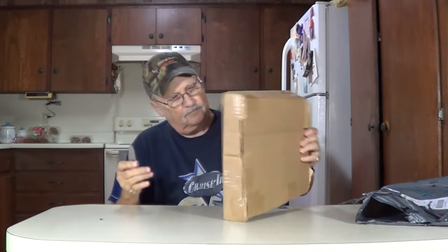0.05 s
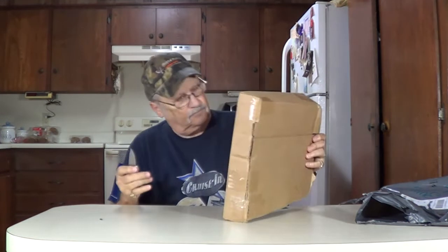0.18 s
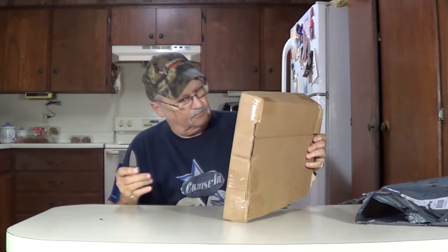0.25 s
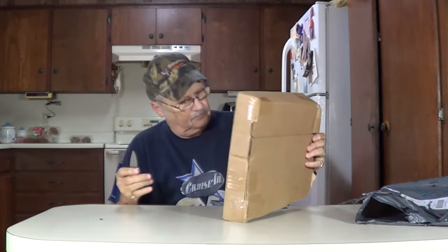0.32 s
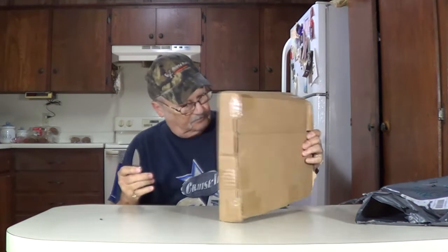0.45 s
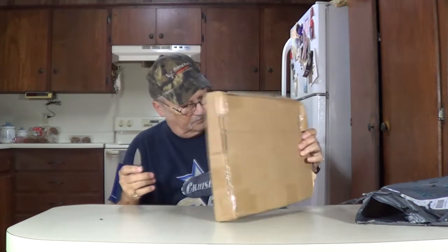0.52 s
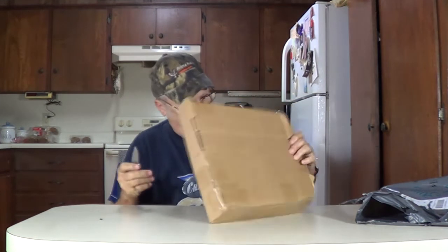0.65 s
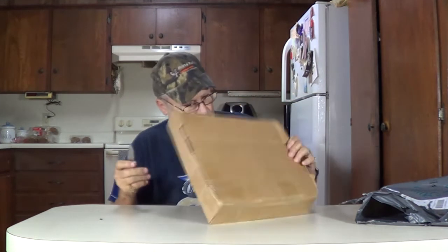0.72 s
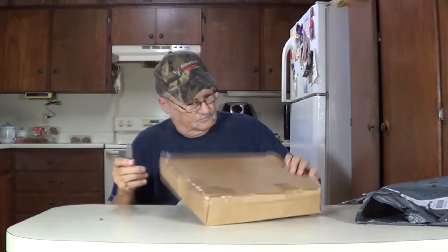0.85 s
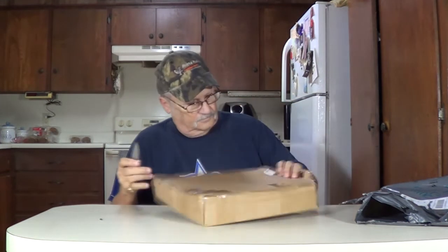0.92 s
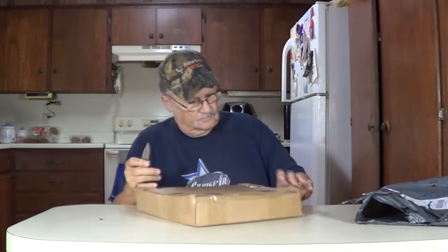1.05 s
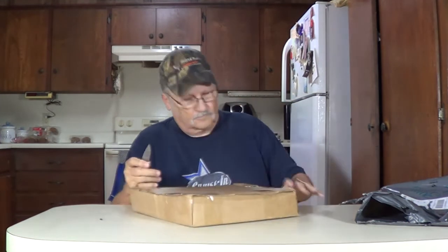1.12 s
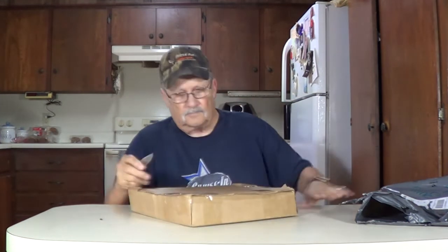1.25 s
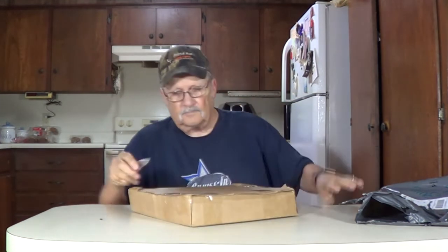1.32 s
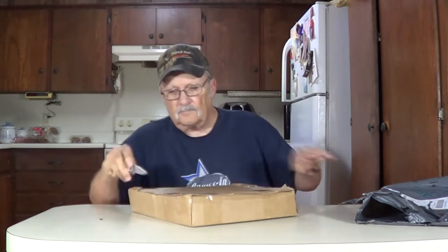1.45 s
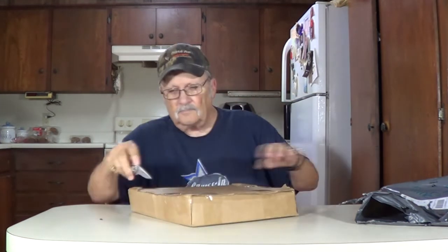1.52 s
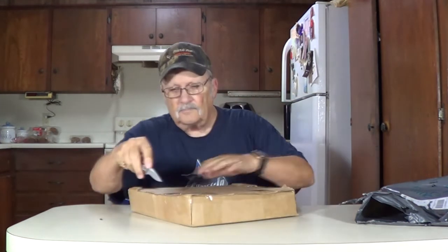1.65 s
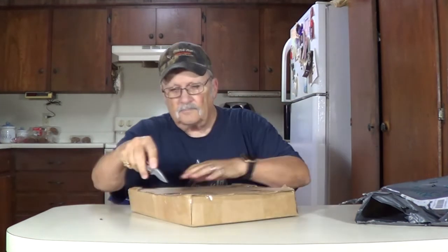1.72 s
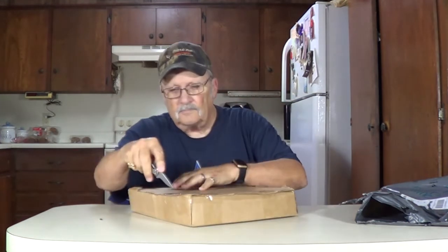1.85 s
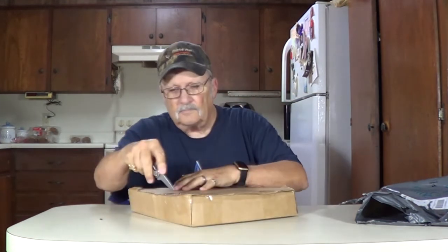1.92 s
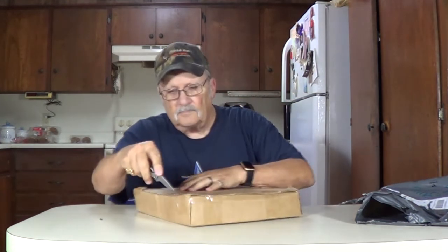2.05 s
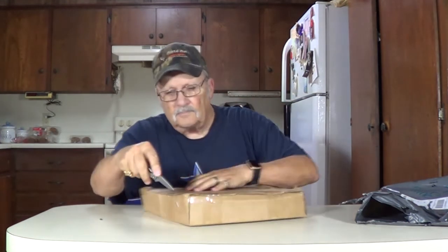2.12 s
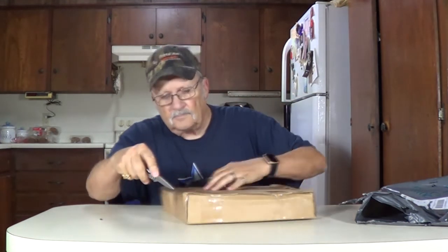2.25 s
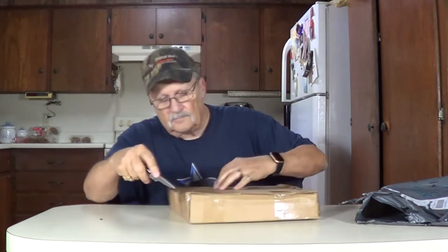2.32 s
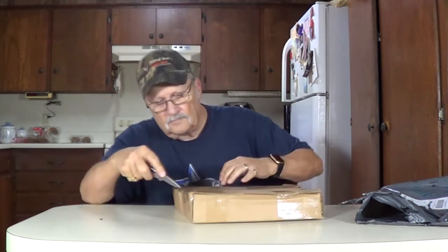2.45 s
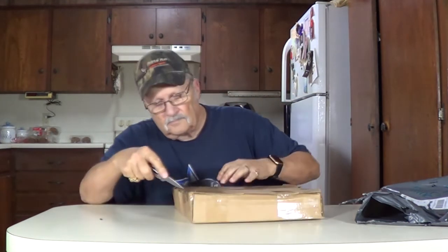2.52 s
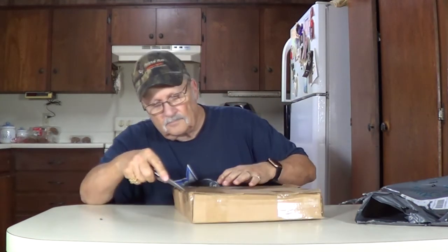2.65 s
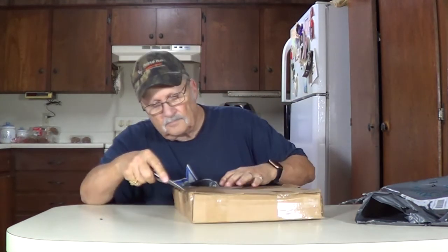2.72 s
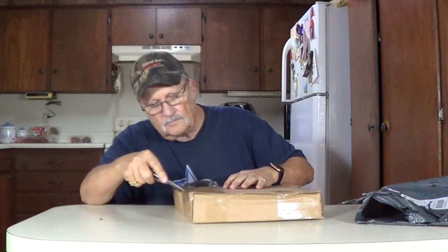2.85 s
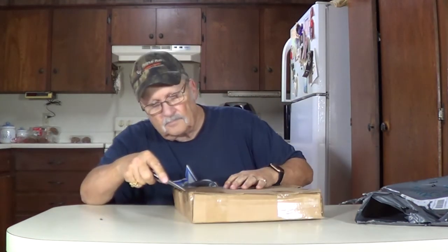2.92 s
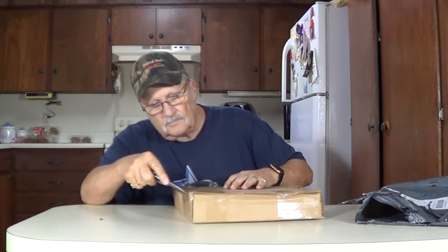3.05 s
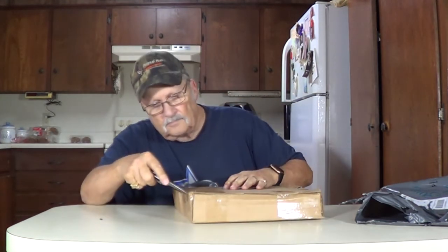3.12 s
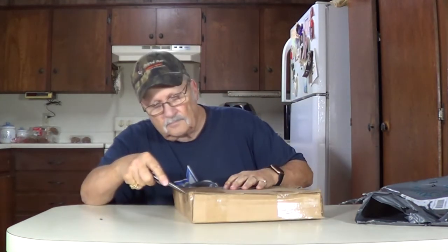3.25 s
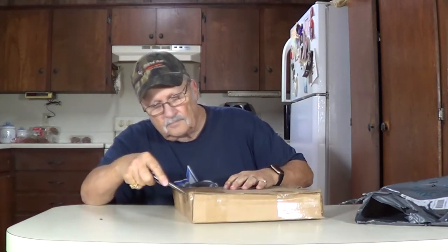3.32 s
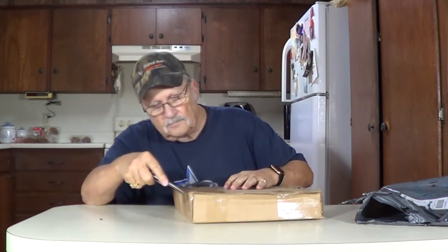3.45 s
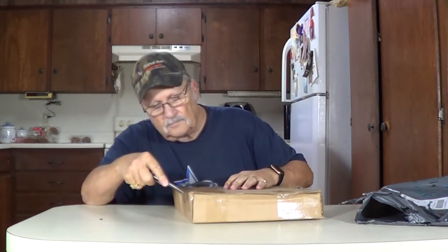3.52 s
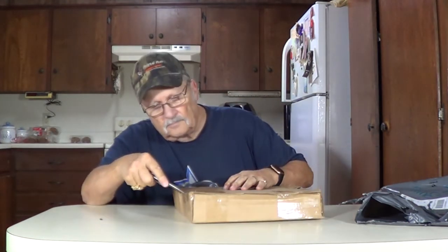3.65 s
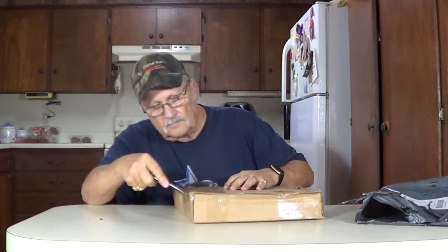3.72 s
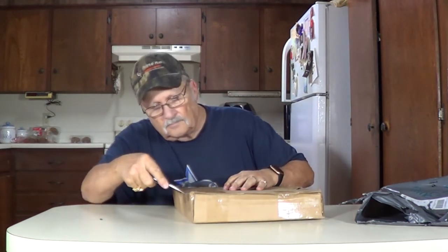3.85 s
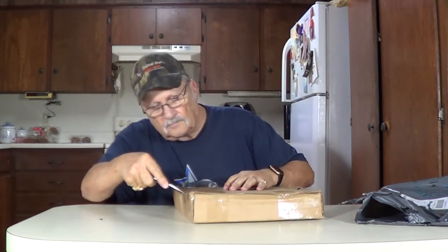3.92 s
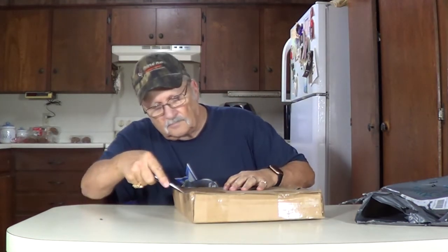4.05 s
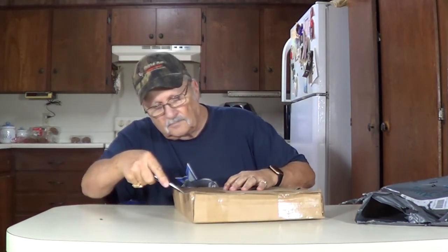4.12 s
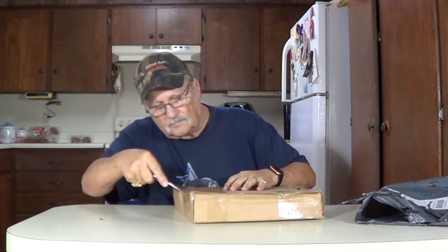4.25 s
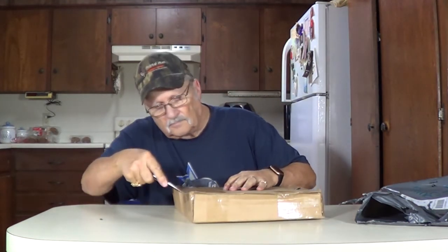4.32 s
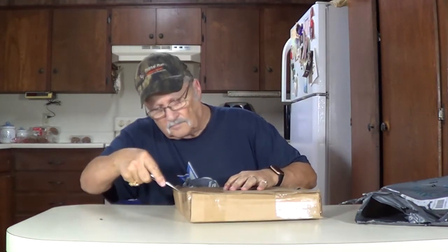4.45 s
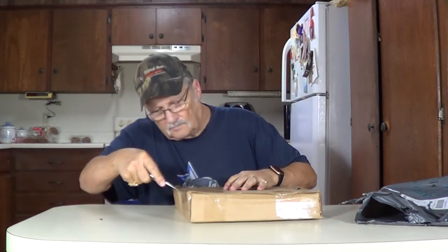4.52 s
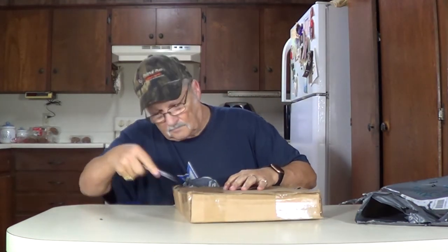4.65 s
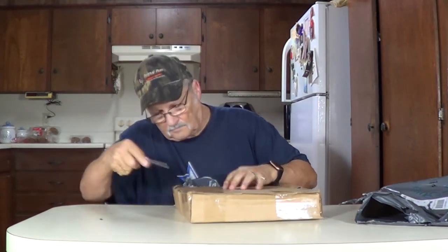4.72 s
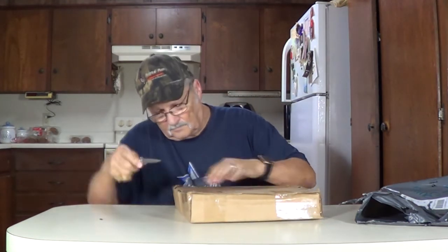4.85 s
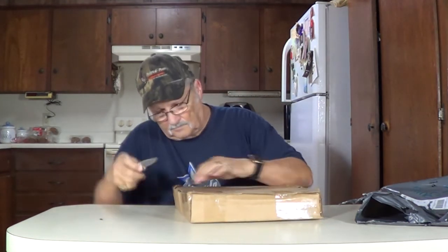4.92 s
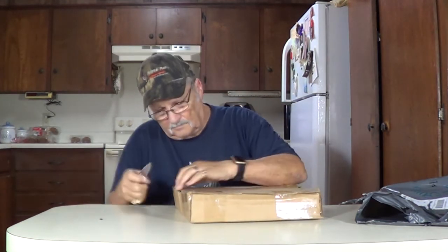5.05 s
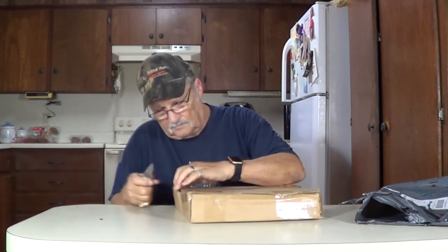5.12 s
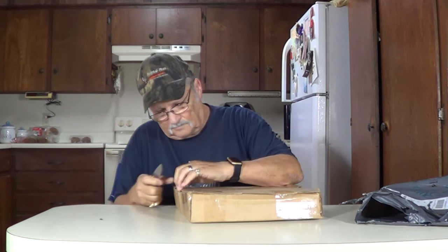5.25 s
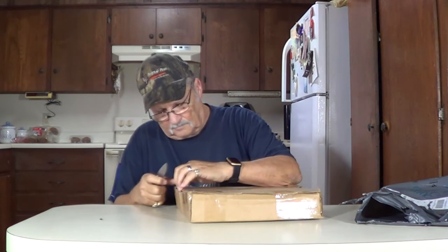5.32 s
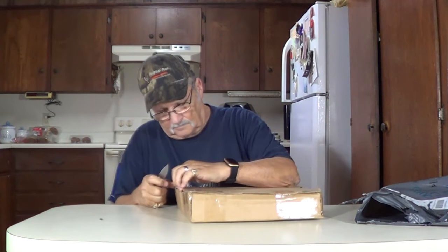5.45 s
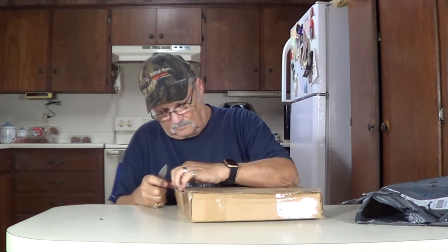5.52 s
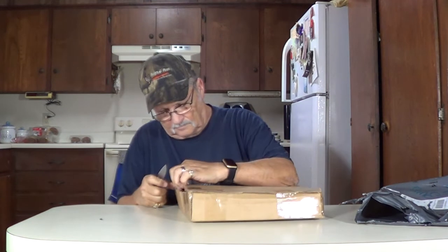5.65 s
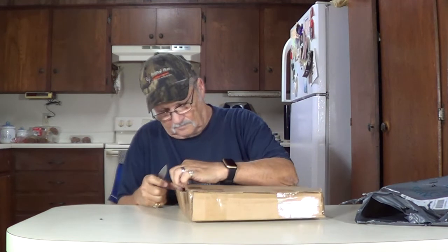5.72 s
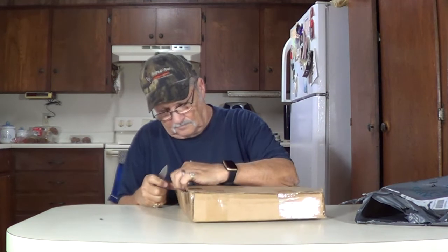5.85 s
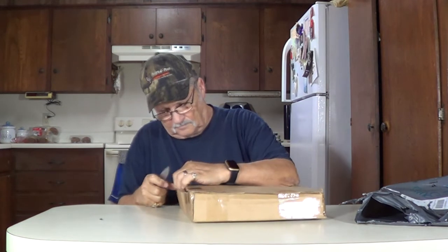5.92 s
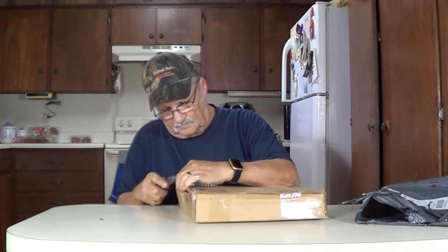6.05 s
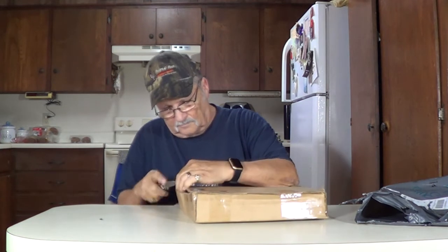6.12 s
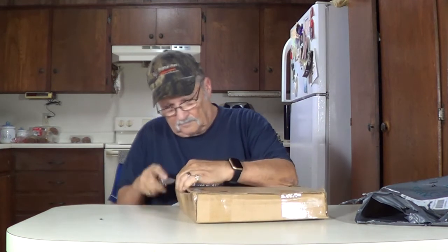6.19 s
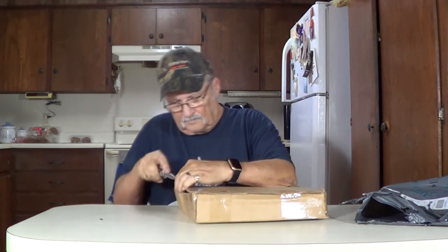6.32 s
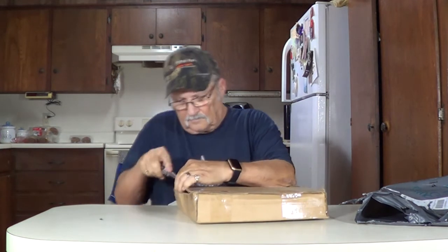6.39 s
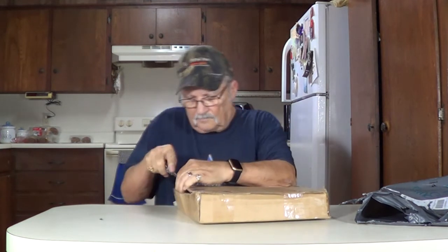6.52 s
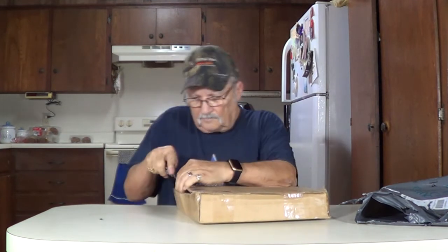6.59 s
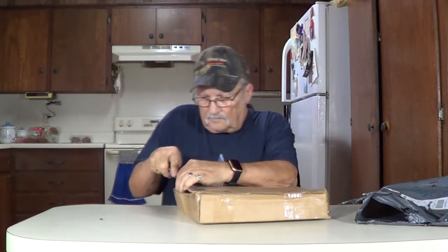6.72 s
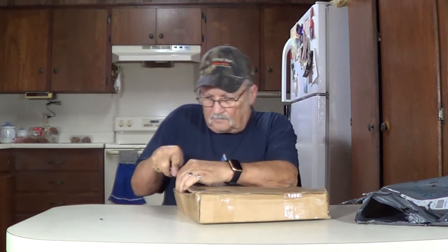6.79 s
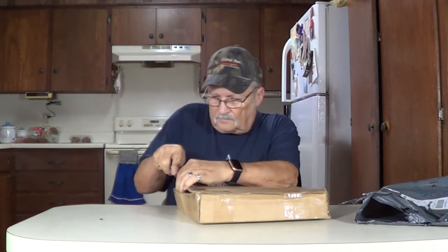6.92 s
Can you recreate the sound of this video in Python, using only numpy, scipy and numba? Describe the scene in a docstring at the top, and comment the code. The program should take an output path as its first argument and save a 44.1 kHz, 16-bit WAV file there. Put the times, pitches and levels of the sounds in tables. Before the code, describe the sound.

A cardboard box slides and drops with hollow bangs on a hard table, then a knife ticks, scrapes and snaps its tape.

```python
"""A flat cardboard box is turned, dropped and slid on a hard table in a quiet kitchen; a knife picks at its tape.
First come hissing slides and light knocks; just after 1 s the box drops with loud bangs, then slides until
about 2.6 s. Small ticks follow near 3.4 s. From 4 s the knife makes a flap hum, tape snaps and walls knock, until
a last faint knock at 6.7 s. Slides and walls are gritty noise, blows and snaps are clicks with a rattle of
grains; a small room rings after them, over steady hush and fridge hum."""
import sys
import numpy as np
from scipy import signal
from scipy.fft import rfft, irfft
from scipy.io import wavfile
from scipy.ndimage import uniform_filter1d
from numba import njit

SR = 44100
rng = np.random.default_rng(int(sys.argv[2]) if len(sys.argv) > 2 else 0)


def pcm_store(signal):
    """Save signal as 16-bit PCM."""
    levels = np.round(np.clip(np.atleast_2d(signal), -1, 1) * 32767)
    wavfile.write(sys.argv[1], SR, levels.astype(np.int16).T)


N = 307238
T = np.arange(N) / SR

# Every stroke rises to full level, holds and falls; rise and fall are the times for a change of STROKE_RANGE_DB.
# Card sliding on the table top or under fingers:
# (time of full level [s], level [dB], rise [s], hold [s], fall [s], dull part against bright part [dB])
SLIDE_STROKES = [(0.0, -36.5, .05, 0.042, 0.086, -3), (.212, -44, 0.13, .02, 0.076, -3.5),
                 (.484, -32.5, 0.11, 0.014, 0.065, -4.5), (.56, -44, 0.059, 0.2, 0.11, -1.5),
                 (.868, -41, 0.3, .005, 0.44, 1.5), (1.072, -35, 0.14, .005, 0.13, 1.5),
                 (1.15, -38, 0.083, .005, 0.21, 3), (1.28, -50, .1, .11, 0.036, -8),
                 (2.05, -49, .13, .05, 0.13, -4.5), (2.13, -41.5, 0.16, 0.21, 0.15, 2.5),
                 (2.25, -35, 0.23, 0.18, 0.13, 0.5), (2.89, -69, 0.045, 0.048, .12, -1),
                 (3.926, -60.5, 0.15, .005, .1, .1), (4.04, -48, 0.032, .003, 0.063, 3.5),
                 (4.08, -46, 0.032, .003, 0.13, 3.5), (4.164, -43.5, 0.033, 0.097, .05, 1),
                 (4.302, -30, 0.039, 0.0023, 0.06, 0.5), (4.376, -36, 0.05, .003, 0.22, 1.5),
                 (4.568, -45, 0.032, .003, 0.28, 3.5), (4.652, -42.5, .02, .003, 0.056, 2),
                 (4.78, -51.5, 0.036, 0.077, 0.056, -4), (5.03, -42.5, 0.044, .14, .05, 1),
                 (5.195, -40.5, 0.023, .003, 0.17, 8.5), (5.305, -44.5, .13, .003, 0.041, 4),
                 (5.33, -55.5, .02, .003, 0.17, 17), (5.455, -50, 0.12, 0.018, .03, 1.5),
                 (5.5, -40.5, 0.025, 0.0026, 0.073, -0.5), (5.585, -47, 0.051, .003, 0.39, 15),
                 (5.78, -50.5, 0.3, 0.12, .1, 0), (5.82, -46.5, .02, .003, 0.079, 5),
                 (5.944, -38.5, 0.044, 0.0026, 0.19, 3), (6.06, -39, .03, .003, 0.15, 3.5),
                 (6.136, -35, 0.037, 0.0023, 0.044, 7), (6.15, -41.5, .02, .003, 0.18, 4),
                 (6.45, -53.5, 0.23, 0.094, 0.12, 0.5)]
# Tone of the bright and the dull part of sliding: (frequency [Hz], relative level [dB])
SLIDE_BRIGHT_TONE = [(3820, -25), (6500, -16), (7560, -6), (9480, 1), (12100, -8.5), (14000, -7.5),
                     (15500, -24.5), (16000, -2)]
SLIDE_DULL_TONE = [(590, -18.5), (1000, -22), (1060, -20), (2040, -12.5), (2920, -11.5), (3950, -10),
                   (5600, -3), (7530, -2.5), (8000, 11.5), (10400, -36.5), (17600, -120)]
# Panels flexing and scraping; the blended width is later kept within 0.2 to 4 octaves:
# (time of full level [s], level before the box [dB], rise [s], hold [s], fall [s], centre [Hz], width [octaves])
FLEX_STROKES = [(.06, -48.5, .12, .07, .1, 430, 2.7), (.202, -40, 0.083, .005, 0.053, 480, 1.3),
                (.3, -59.5, 0.12, .04, .2, 346, 3.9), (.42, -58, .1, .02, 0.35, 780, 1.4),
                (.69, -58.5, 0.22, .01, .1, 364, 1.5), (.804, -51.5, .08, .005, .09, 344, 10),
                (.892, -53.5, 0.14, .005, .25, 435, 2.1), (1.122, -30, 0.13, .005, .14, 500, 2.1),
                (1.25, -45.5, .1, .05, .15, 440, 1.7), (1.4, -70.5, .1, .05, 0.67, 370, 4.7),
                (2.08, -58, 0.13, .02, .4, 910, 2.6), (2.43, -62, .2, .07, 0.4, 683, 3.9),
                (4.1, -42, .16, .01, 0.26, 810, 4.1), (4.28, -42, 0.33, .11, 0.27, 945, 3),
                (4.6, -42, 0.14, .03, 0.25, 567, 1.7), (5.146, -47.5, .19, .005, .28, 892, 3.7),
                (5.282, -36.5, 0.025, .005, 0.18, 927, 4.2), (5.46, -49, 0.069, .09, .1, 1250, 2.3),
                (5.588, -35.5, 0.15, .005, 0.11, 820, 3.7), (5.62, -42.5, .05, .07, 0.16, 940, 5.7),
                (5.76, -54, .1, .13, .1, 358, 3.9), (5.9, -49.5, 0.027, .005, 0.14, 383, 1.9),
                (5.99, -46, 0.16, .04, 0.13, 498, 2.3), (6.1, -27.5, .13, .005, 0.14, 1140, 1.3),
                (6.36, -62, .1, .12, 0.14, 777, 2.1), (6.57, -65.5, 0.12, .005, .15, 760, 1.9),
                (6.68, -69.5, .1, .16, 0.31, 373, 2.5)]
# Blows on the box:
# (time [s], click peak before the box [dB], centre [Hz], width [octaves], time for rattle to fall 60 dB [s])
KNOCK_EVENTS = [(.077, -31, 356, 1.3, 0.072), (.095, -28, 590, 0.78, 0.093), (.111, -32.5, 330, 0.7, 0.069),
                (.197, -34, 550, 1.1, 0.044), (.264, -34, 337, 1.7, 0.1), (.713, -41, 350, 2.5, .2),
                (.745, -41.5, 308, 0.58, 0.17), (.835, -43.5, 2150, .48, 0.36),
                (1.043, -34, 1500, 1.6, 0.065), (1.067, -20, 623, 1.37, 0.27),
                (1.116, -38, 560, 0.76, 0.14), (1.147, -11.5, 1000, 0.63, .063),
                (1.153, -15, 368, 1.9, 0.085), (1.168, -12, 285, 3, 0.037), (1.172, -17.5, 250, 1.4, 0.057),
                (1.183, -29, 286, 3.1, 0.067), (1.211, -23.5, 463, 2.3, 0.093),
                (2.155, -42, 880, 0.2, .051), (3.42, -47.5, 930, 0.51, 0.073),
                (4.040, -38.5, 934, 0.098, .043), (4.076, -14, 925, 0.82, 0.043),
                (4.077, -24.5, 303, 1.3, 0.046), (4.245, -33, 934, 0.39, 0.055),
                (4.288, -28, 925, 0.33, 0.029), (4.297, -22.5, 925, 1.5, 0.089),
                (4.379, -31, 950, 0.48, 0.097), (4.571, -29.5, 390, 2.2, 0.15),
                (4.636, -20.5, 676, 1.9, 0.047), (4.654, -23.5, 605, 1.24, 0.21),
                (4.655, -22, 2100, 0.51, 0.079), (5.184, -14, 1300, 1.74, .1),
                (5.188, -28, 300, 0.75, 0.021), (5.201, -25, 277, 0.38, 0.079),
                (5.280, -29, 1120, 1.1, .078), (5.296, -30, 1050, 0.65, 0.029),
                (5.317, -27.5, 2100, .48, 0.091), (5.490, -13.5, 1410, 0.77, 0.08),
                (5.492, -27.5, 2420, 0.3, 0.018), (5.499, -14, 1240, 1.27, 0.023),
                (5.575, -13, 680, 5, 0.042), (5.950, -34.5, 404, 1.5, 0.14),
                (6.051, -27.5, 1090, 1.05, .18), (6.715, -46, 225, 1.6, 0.1)]
# Tape letting go and edges ticking:
# (time [s], click peak before the bass cut [dB], centre [Hz], width [octaves], time for crackle to fall 60 dB [s])
SNAP_EVENTS = [(.776, -25, 6000, 2.3, .045), (1.0435, -24, 9000, 1.3, 0.029),
               (1.067, -15, 9150, 1.5, 0.035), (1.116, -19.5, 8500, 1.4, 0.05),
               (1.146, -12.5, 9400, 2.4, 0.038), (1.211, -22, 8500, 1.3, 0.039),
               (1.377, -30.5, 10100, 0.86, 0.058), (2.049, -40, 5500, 1.3, 0.041),
               (2.281, -14, 9400, 0.75, 0.071), (2.2893, -14, 9200, 1.4, .043),
               (3.417, -24, 5520, 1.3, 0.023), (3.426, -31, 5400, .9, .015),
               (3.429, -19, 5660, 0.98, 0.056), (3.433, -31, 3370, 0.35, 0.14),
               (3.930, -41, 5740, 0.84, 0.041), (4.039, -46, 9500, 1.1, .045),
               (4.077, -20.5, 5000, 2.1, 0.25), (4.167, -25, 5640, 2.6, .069),
               (4.288, -17.5, 9890, 0.76, 0.036), (4.301, -19, 9450, 3.9, .045),
               (4.378, -20.5, 9500, 1.7, 0.042), (4.571, -30, 9300, 1.1, 0.026),
               (4.636, -28, 6000, 1.4, 0.023), (4.655, -31.5, 4070, 0.4, 0.15),
               (5.184, -12.5, 5000, .8, 0.18), (5.1845, -14, 9400, 0.52, .037),
               (5.317, -11.5, 5300, 1.4, 0.017), (5.491, -29, 4230, 0.2, .019),
               (5.576, -6.5, 5700, 0.54, 0.036), (5.812, -18, 8350, 0.9, 0.033),
               (5.938, -26, 9700, 1.4, .04), (6.051, -14, 6100, 1.2, 0.017),
               (6.128, -19.5, 5550, 1.4, 0.015), (6.135, -9.5, 7500, 2.6, 0.0093),
               (6.142, -34, 7040, 1.1, .035), (6.455, -42, 8630, 1.3, .05)]
# Pushes of the blade that shake the flap under it: (time of full level [s], level [dB])
FLAP_PUSHES = [(4.086, -36), (4.125, -43), (4.153, -39.5), (4.285, -42), (4.386, -57)]
# Ringing modes of the panels: (frequency [Hz], width [Hz], ring against contact sound [dB])
PANEL_MODES = [(185, 60, 6), (285, 52, 6.5), (320, 21, 7), (444, 71, -0.5), (586, 130, -3), (747, 220, -3),
               (925, 18, -1), (1145, 17, -21.5), (1245, 29, -14), (1490, 49, -8), (1662, 68, -4.5),
               (2054, 220, -5.5)]
# The room's ringing:
# (frequency [Hz], time to fall 60 dB [s], level against direct sound [dB], likeness of left and right [0-1])
ROOM_BANDS = [(60, 0.51, -8.5, 0.36), (251.4, 0.27, -6, 0.2), (577, 0.28, -4, 0.9), (2000, 0.28, -5, 0.2),
              (3630, 0.34, -0.5, 0.5), (6000, 0.28, -11.5, 0), (9000, 0.25, -1, 0.3),
              (14000, 0.098, -7.5, 0.4)]
# Tone of the kitchen hush: (frequency [Hz], relative level [dB])
HUSH_TONE = [(15, -47), (25, -5.5), (49, -8.5), (161, 0), (206, -3.5), (301, -0.5), (384, -7), (463, -4),
             (560, -6), (911, -6.5), (2050, -13), (2220, -13.5), (3920, -15.5), (5200, -19), (8360, -16.5),
             (16000, -27)]
# How far the hush differs between left and right: (frequency [Hz], unlike part against common part [dB])
HUSH_SIDE_TONE = [(25, -1.5), (100, -15), (400, -4.5), (3000, -2.5), (16000, -8)]
# Fridge tones: (frequency [Hz], rms level before the housing [dB])
FRIDGE_TONES = [(150.7, -77.5), (301.5, -77), (1572, -80), (2094, -80.5), (2412, -86.5), (3887, -83.5)]
# Bands changed by the camera housing: (frequency [Hz], width [Hz], gain [dB])
HOUSING_BANDS = [(2100, 620, 2.5), (2870, 910, -2), (5000, 2930, 1), (8000, 1500, -13.5), (9400, 2000, 2)]

STROKE_RANGE_DB = 30
RATTLE_DB, CRACKLE_DB = -5.5, -14.5  # starting level of grains after a knock and a snap, against the click
RATTLE_SCATTER_DB, CRACKLE_SCATTER_DB = 3, 1.1  # how unequal the grains are
TAPE_LOW_HZ = 2460
FLAP_HZ, FLAP_OCTAVES = 920, 0.1
FLAP_RISE_S, FLAP_HOLD_S, FLAP_FALL_S = 0.024, 0.0048, 0.1
BOX_BAND_HZ = (174, 3950)
BOX_DB = -4.5  # how much of a blow or a flex the panels pass to the air
TABLE_HZ, TABLE_OCTAVES, TABLE_DB = 87, 0.78, 2.5
LEFT_DB = .6  # left against right, for everything but the background
KITCHEN_DB = -63.5
TOP_HZ = 15800


def slides():
    """Fine paper grain hisses as it slides; heavier contact adds a duller part."""
    bright = colour(grit(2.25, hold=60), SLIDE_BRIGHT_TONE)
    dull = colour(grit(1.5, hold=90), SLIDE_DULL_TONE)
    level, dull_db = strokes(SLIDE_STROKES)
    return level * (bright + undb(dull_db) * dull)


def flex():
    """The walls stick and slip coarsely, in a band that moves with the place of contact."""
    level, hz, octaves = strokes(FLEX_STROKES)
    octaves = np.clip(octaves, .2, 4)
    rub = double_band(grit(2.07, hold=150), hz, octaves)
    # a band wider in Hz carries more power, so even it out
    even_rub = unit(rub / np.sqrt(hz * octaves))
    return even_rub * level


def knocks():
    """Each blow on the box is a click followed by a dying rattle of small grains."""
    return blows(KNOCK_EVENTS, RATTLE_SCATTER_DB, RATTLE_DB)


def box(push):
    """The panels ring briefly with their modes; small soft walls send out only a middle band."""
    ring = 0
    for hz, width, db in PANEL_MODES:
        ring = ring + undb(db) * peak(push, hz, width)
    middle_band = signal.butter(3, BOX_BAND_HZ, "bandpass", fs=SR, output="sos")
    return signal.sosfilt(middle_band, push + ring)


def table_thud(push):
    """The table top answers each blow with a dull low thud."""
    return undb(TABLE_DB) * band(push, TABLE_HZ, TABLE_OCTAVES)


def tape_snaps():
    """Tape lets go and edges tick in sharp crackles; thin tape has no bass."""
    crackles = blows(SNAP_EVENTS, CRACKLE_SCATTER_DB, CRACKLE_DB)
    bass_cut = signal.butter(2, TAPE_LOW_HZ, "highpass", fs=SR, output="sos")
    return signal.sosfilt(bass_cut, crackles)


def flap():
    """Friction of the blade shakes the flap, which rings at one narrow pitch."""
    pushes = [(s, db, FLAP_RISE_S, FLAP_HOLD_S, FLAP_FALL_S) for s, db in FLAP_PUSHES]
    level, = strokes(pushes)
    return level * unit(band(grit(2.5, hold=200), FLAP_HZ, FLAP_OCTAVES))


def room(x):
    """Direct sound, then a dense tail: each band fades at its own rate, partly unlike left and right."""
    size = 16384
    t = np.arange(size) / SR
    hz, *columns = np.transpose(ROOM_BANDS)
    tail = 0
    for f in 44 * 2 ** np.arange(0, 8.6, .5):
        t60, db, alike = (np.interp(np.log(f), np.log(hz), c) for c in columns)
        mid, side = (band(rng.standard_normal(size), f, 0.31) for _ in range(2))
        # the tail swells in from 0.6 to 1.8 ms after the direct sound
        fade = undb(-60 * t / t60) * np.clip(t / 0.0012 - .5, 0, 1)
        alike = np.clip(alike, 0, 1)
        pair = np.sqrt(1 + alike) * mid + np.sqrt(1 - alike) * side * np.array([[1], [-1]])
        tail = tail + pair * fade / np.sqrt(np.sum(fade ** 2)) * undb(db)
    # the first reflections arrive as separate echoes, later ones merge
    lumps = np.repeat(rng.standard_normal(size // 32), 32) * np.exp(-t / 0.036)
    tail = tail * undb(3.2 * lumps)
    tail[:, 0] = 1  # direct sound
    # even out the loudness over stretches about 100 Hz wide, so the room adds no broad colour
    answer = rfft(tail, 2 * size)
    local_power = uniform_filter1d(np.abs(answer) ** 2, size=75)
    even = irfft(answer / np.sqrt(local_power))[:, :size]
    return signal.fftconvolve(x[None], even, axes=1)[:, :N]


def kitchen():
    """Air and appliances make a hush, partly unlike left and right."""
    mid, side = colour(rng.standard_normal((2, N)), HUSH_TONE)
    side = shape(side, HUSH_SIDE_TONE)
    return undb(KITCHEN_DB) * (mid + side * np.array([[1], [-1]]))


def fridge():
    """The fridge hums in wavering tones, each a very narrow band of noise."""
    hum = 0
    for hz, db in FRIDGE_TONES:
        hum = hum + undb(db) * unit(band(rng.standard_normal(N), hz, 6 / hz))
    return hum


def strokes(table):
    """Gain of all strokes together, then each further column as a blend that leans to the loudest stroke."""
    t = T[::64]  # a coarse time grid is enough for slow changes
    s, db, rise, hold, fall, *columns = np.transpose(table)[:, :, None]
    before = (s - t) / np.maximum(rise, .002)
    after = (t - s - np.abs(hold)) / np.maximum(fall, .002)
    away = np.maximum(before, after)
    power = undb(db - STROKE_RANGE_DB * np.clip(away, 0, 20)) ** 2
    total = power.sum(axis=0)
    curves = [np.sqrt(total)]
    for column in columns:
        curves.append((power * column).sum(axis=0) / total)
    return [np.interp(T, t, curve) for curve in curves]


def grit(spread_db, hold):
    """Dense friction grains: noise whose size jumps every `hold` samples."""
    size = undb(spread_db * rng.standard_normal(N // hold + 1))
    return unit(rng.standard_normal(N) * np.repeat(size, hold)[:N])


def blows(table, scatter_db, rattle_db):
    """Each event is a sharp click and a dying rattle of small grains, both in a band of their own."""
    size = 8192
    out = np.zeros(N + size)
    t = np.arange(size) / SR
    for s, db, hz, octaves, t60 in table:
        click = double_band(1. * (t == 0), hz, octaves)
        click = click / np.abs(click).max()
        grain_size = undb(scatter_db * rng.exponential(size=size))
        grains = unit(double_band(rng.standard_normal(size) * grain_size, hz, octaves))
        fade = undb(rattle_db - 60 * t / max(t60, .002))
        # the rattle needs about a cycle to start
        rattle = grains * fade * np.minimum(t * hz, 1)
        i = int(s * SR)
        out[i:i + size] += undb(db) * (click + rattle)
    return out[:N]


def undb(db):
    """Turns decibels into a plain gain."""
    return 10 ** (np.asarray(db) / 20)


def unit(x):
    """Brings a sound to rms 1."""
    return x / np.sqrt(np.mean(x ** 2))


def shape(x, points):
    """Filters by a gain curve through points of (frequency [Hz], gain [dB])."""
    hz, db = np.transpose(points)
    f = np.fft.rfftfreq(x.shape[-1], 1 / SR) + 1  # 1 Hz added so that the logarithm exists
    gain = undb(np.interp(np.log(f), np.log(hz), db))
    return irfft(rfft(x) * gain, x.shape[-1])


def colour(x, points):
    """Shapes the tone, then brings it to rms 1."""
    return unit(shape(x, points))


def peak(x, hz, width):
    """One resonance with gain 1 at its centre and a width in Hz."""
    return signal.lfilter(*signal.iirpeak(hz, hz / width, fs=SR), x)


@njit
def svf(x, hz, octaves):
    """Band-pass with moving centre and width, gain 1 at the centre."""
    y, b, l = np.empty(len(x)), 0., 0.
    for i in range(len(x)):
        g = np.tan(np.pi * hz[i] / SR)
        k = 2 * np.sinh(np.log(2) * octaves[i] / 2)
        v = (b + g * (x[i] - l)) / (1 + g * (g + k))
        b, l, y[i] = 2 * v - b, l + 2 * g * v, k * v
    return y


def band(x, hz, octaves):
    """The band-pass for a fixed or moving centre and width."""
    return svf(x, hz + 0 * x, octaves + 0 * x)


def double_band(x, hz, octaves):
    """A band-pass followed by one twice as wide, for steeper sides."""
    return band(band(x, hz, octaves), hz, 2 * octaves)


def scene():
    """Box, table, tape, slides and flap sound in the room; hush and hum lie underneath."""
    blow = knocks()
    thuds = undb(BOX_DB) * box(blow + flex()) + table_thud(blow)
    near = room(thuds + tape_snaps() + slides() + flap())
    return near * undb([[LEFT_DB / 2], [-LEFT_DB / 2]]) + kitchen() + fridge()


def record(dry):
    """The camera housing lifts and dips a few bands; the top is cut."""
    for hz, width, db in HOUSING_BANDS:
        dry = dry + (undb(db) - 1) * peak(dry, hz, width)
    top_cut = signal.ellip(10, .2, 80, TOP_HZ, fs=SR, output="sos")
    return signal.sosfilt(top_cut, dry)


dry = scene()
out = record(dry)
pcm_store(out)
```